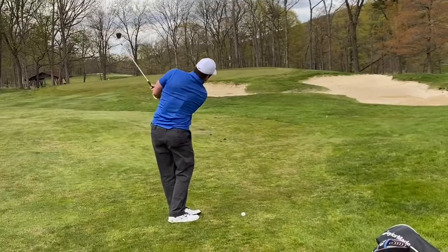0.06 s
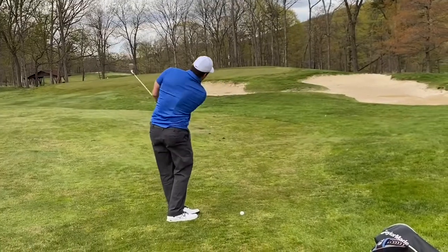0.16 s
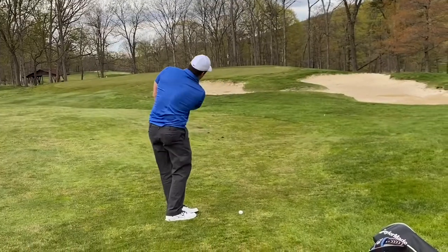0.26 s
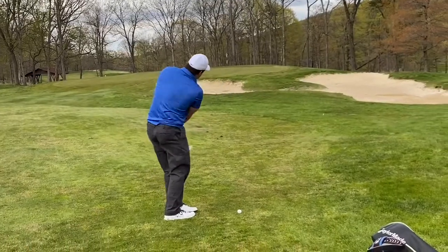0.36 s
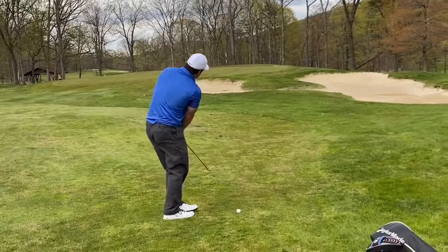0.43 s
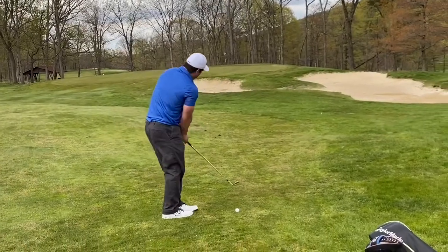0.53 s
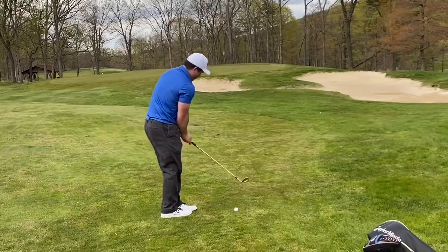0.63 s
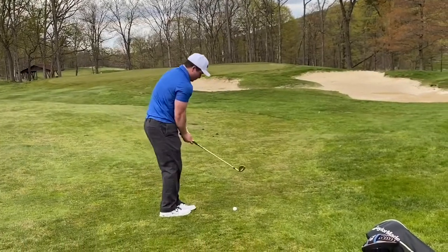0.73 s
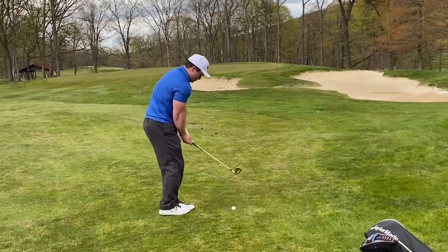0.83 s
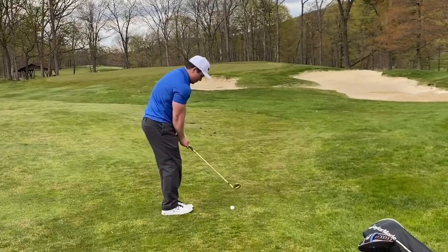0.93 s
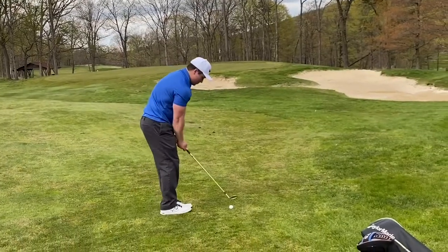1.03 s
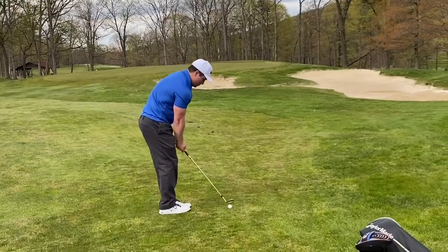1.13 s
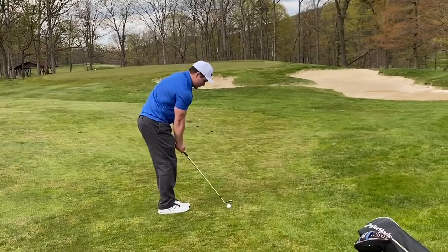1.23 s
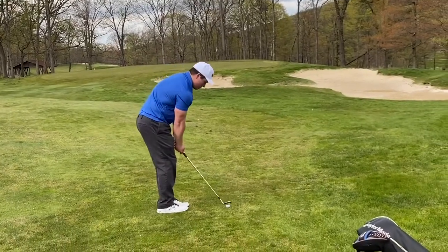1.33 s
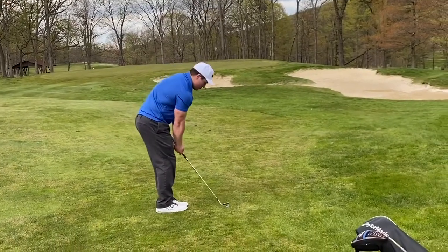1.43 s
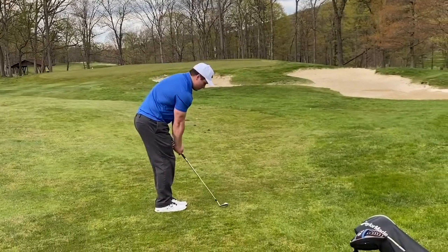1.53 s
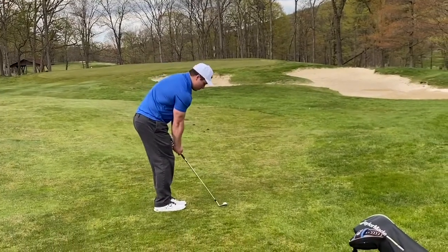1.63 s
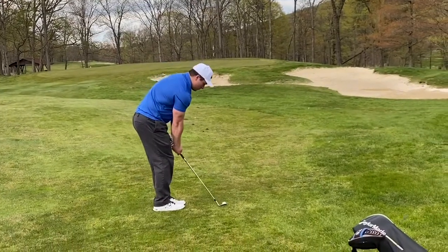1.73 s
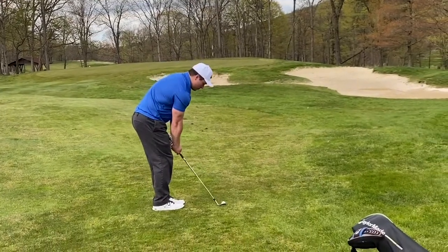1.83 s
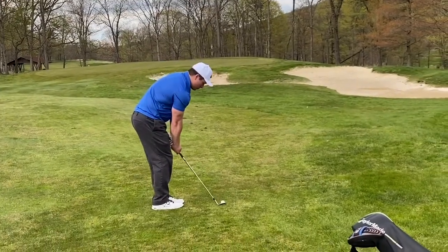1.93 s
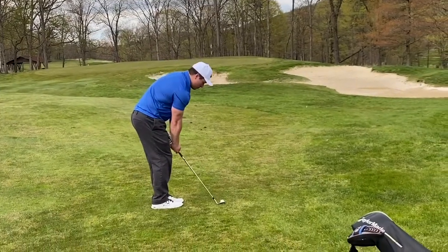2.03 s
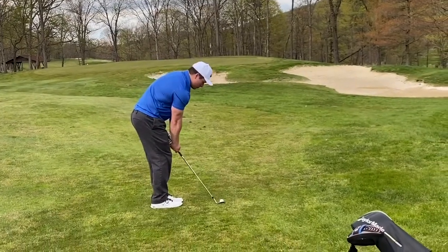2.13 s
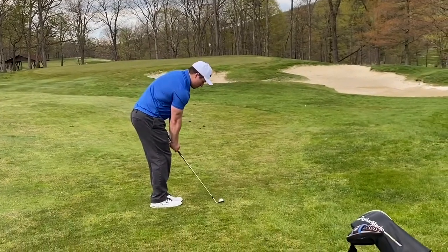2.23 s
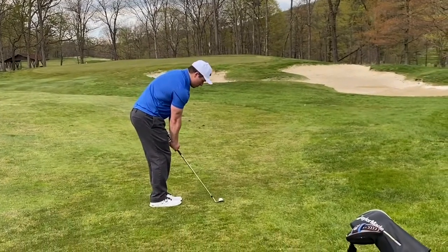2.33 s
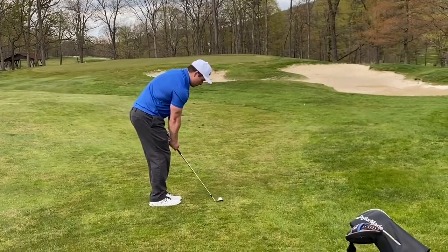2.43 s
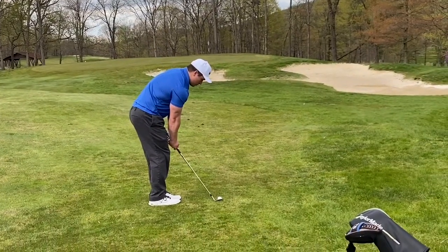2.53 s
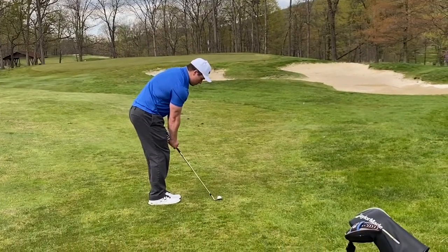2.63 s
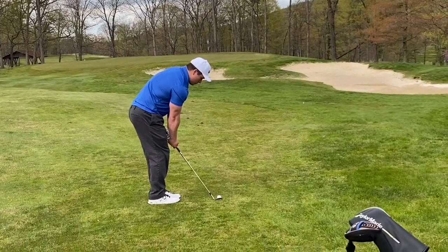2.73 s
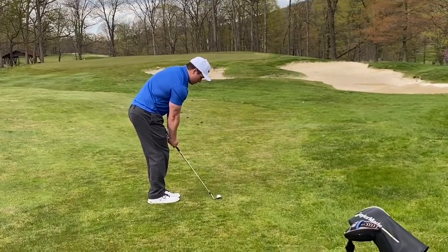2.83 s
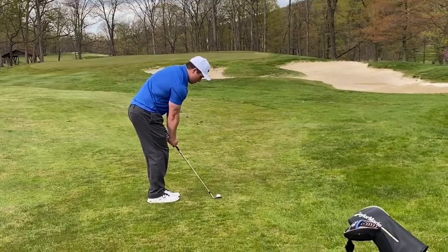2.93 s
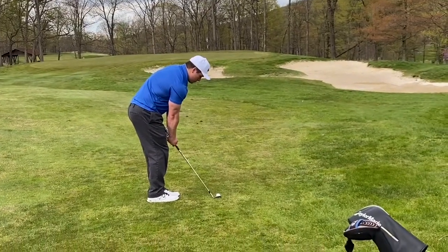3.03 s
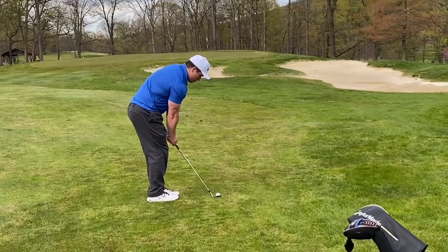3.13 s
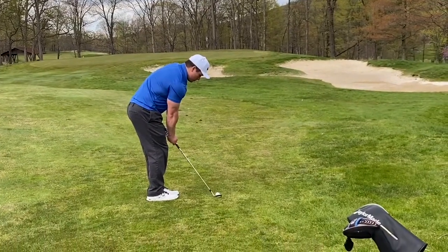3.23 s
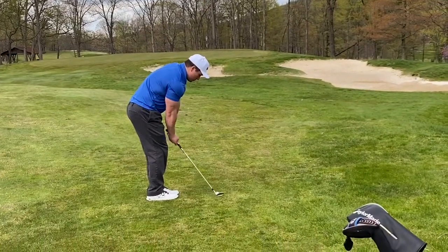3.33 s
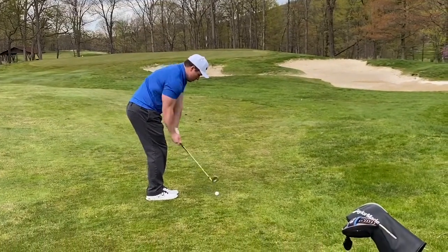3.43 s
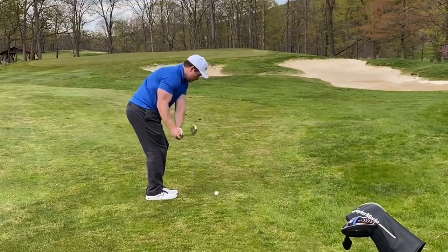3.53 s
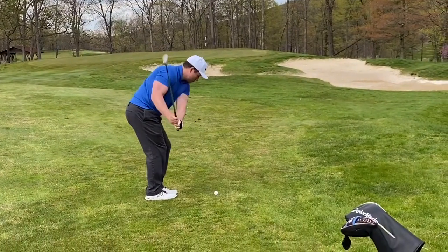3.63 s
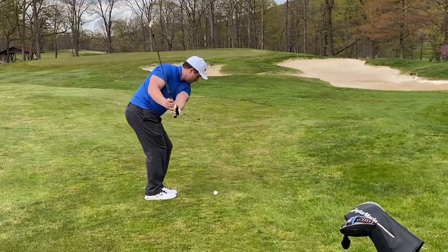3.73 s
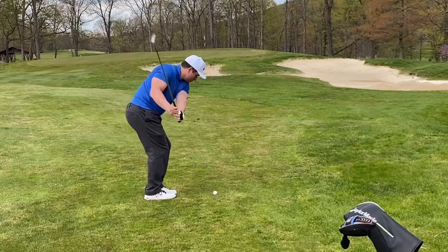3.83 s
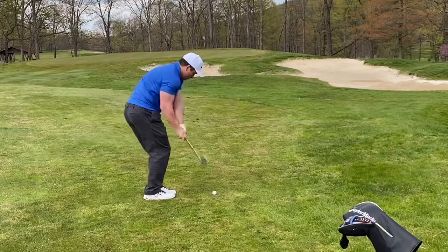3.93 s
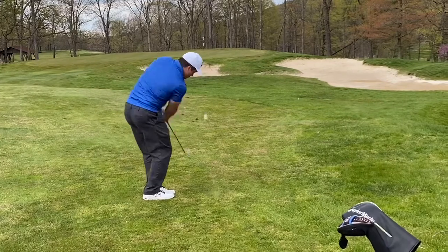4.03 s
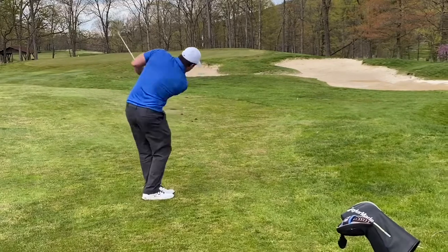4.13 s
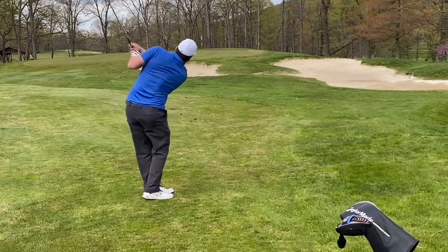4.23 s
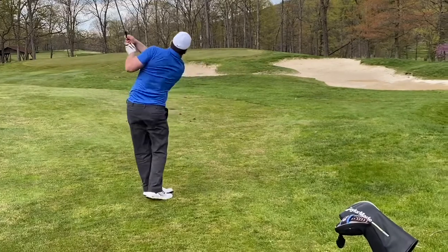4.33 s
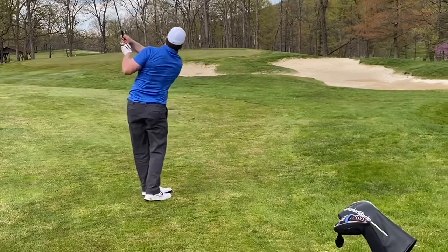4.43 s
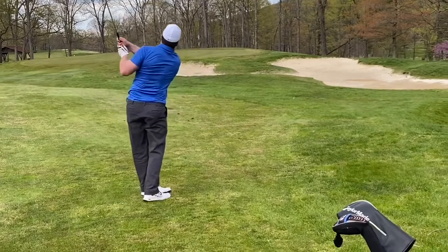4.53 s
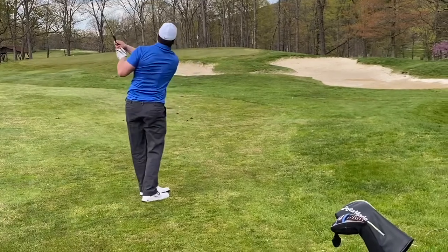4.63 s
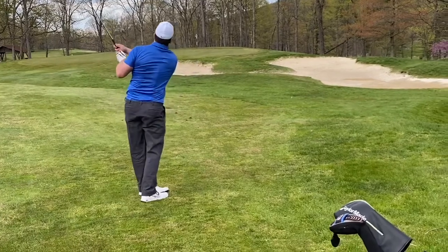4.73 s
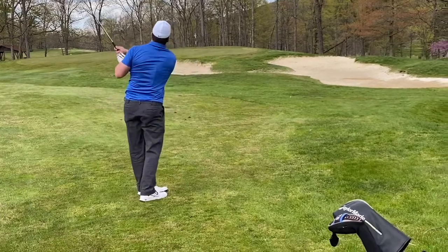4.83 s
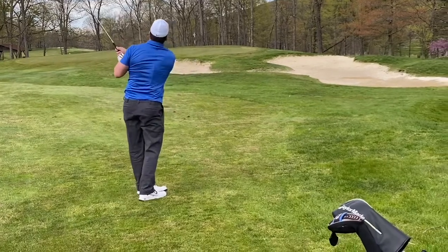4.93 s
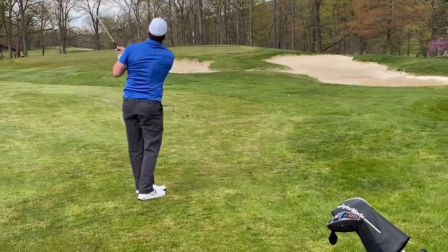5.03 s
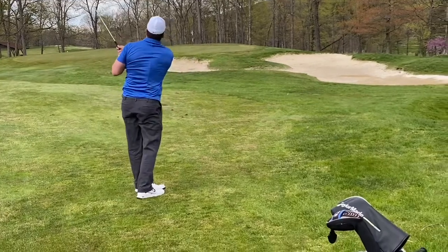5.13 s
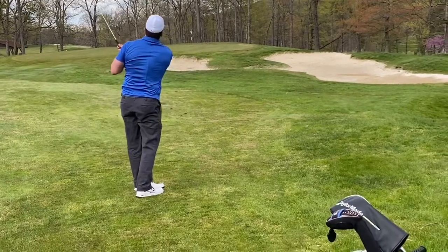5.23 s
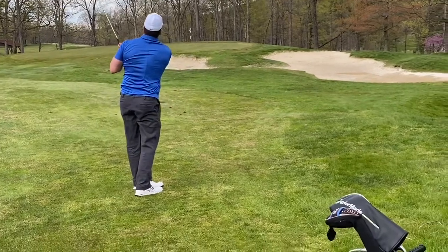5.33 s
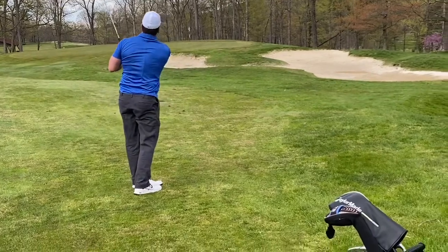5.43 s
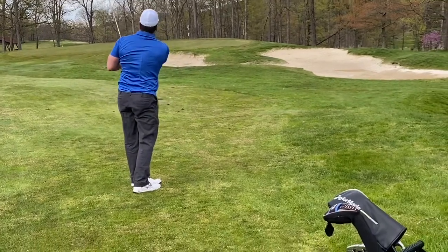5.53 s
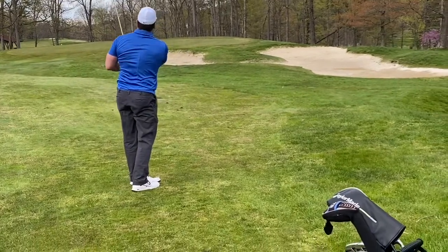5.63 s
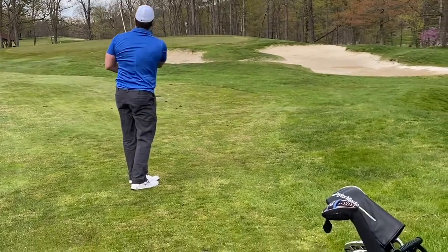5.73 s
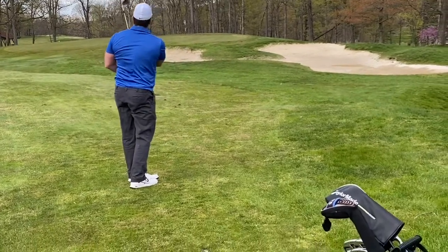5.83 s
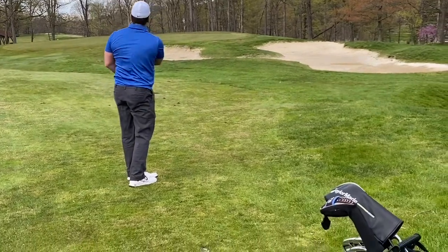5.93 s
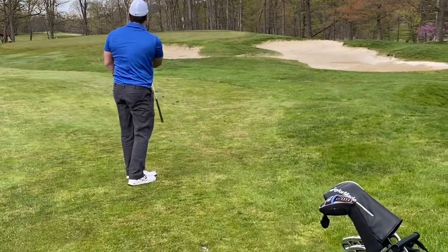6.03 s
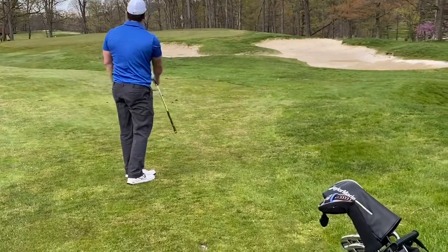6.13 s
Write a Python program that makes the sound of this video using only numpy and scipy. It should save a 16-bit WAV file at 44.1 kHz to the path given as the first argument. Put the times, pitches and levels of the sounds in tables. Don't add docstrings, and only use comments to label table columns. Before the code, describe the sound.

On an open golf course, faint bird whistles, distant traffic hum and light wind surround small ticks from shoes, grip and bag and faint cloth rustles. Nearly four seconds in, a brief swish leads to a crunchy turf scrape and a hard, dry ball click with a low thud. Soil and grass patter down right after, then soft rustles and two dull knocks. Heard from a handheld phone a few metres away, in stereo.

```python
import sys
import numpy as np
from scipy import signal
from scipy.fft import rfft, irfft, next_fast_len
from scipy.io import wavfile

SR = 44100
rng = np.random.default_rng(int(sys.argv[2]) if len(sys.argv) > 2 else 0)


def ratio_of_db(decibels):
    return 10 ** (np.asarray(decibels, float) / 20)


def int16_out(signal):
    q = np.round(np.clip(np.atleast_2d(signal).T, -1, 1) * 32767)
    wavfile.write(sys.argv[1], SR, q.astype(np.int16))


N = 272097
SIZE = next_fast_len(N)
FREQ = np.arange(SIZE // 2 + 1) * SR / SIZE + 1


def curve(points):
    hz, db = np.transpose(points)
    return ratio_of_db(np.interp(np.log(FREQ), np.log(hz), db))


def colour(x, points):
    y = irfft(rfft(x, SIZE) * curve(points), SIZE)[:N]
    return y / np.std(y)


def white():
    return rng.standard_normal(N)


def walk(rate):
    levels = rng.standard_normal(size=2000)
    return 0.98 * np.interp(np.arange(N) * rate / SR, np.arange(len(levels)), levels)


def arch(s, rise_s, hold_s, fall_s, db, edge_db):
    peak_s = s + rise_s
    fall_from_s = peak_s + hold_s
    return [(s, db - edge_db), (peak_s, db), (fall_from_s, db), (fall_from_s + fall_s, db - edge_db)]


def track(rows, fade_s=0.0044):
    s, *columns = np.transpose(rows)
    span = slice(int(s[0] * SR), min(int(s[-1] * SR), N))
    t = np.arange(span.start, span.stop) / SR
    gate = np.clip(np.minimum(t - s[0], s[-1] - t) / fade_s, 0, 1)
    return [span, gate] + [np.interp(t, s, c) for c in columns]


def add(out, s, hz, db, t60, rise_s=0.00043):
    i = int(s * SR)
    t = np.arange(min(int(t60 * SR) + 2, N - i)) / SR - (s - i / SR)
    fade = ratio_of_db(db - 60 * t / t60) * np.clip(t / rise_s, 0, 1)
    out[i:i + len(t)] -= fade * np.sin(2 * np.pi * hz * t)


def grains(per_s, spread_db, hiss):
    hit = rng.random(N) < per_s / SR
    size = rng.exponential(size=N)
    clicks = hit * ratio_of_db(spread_db * np.minimum(size, 3.5)) * np.sign(white())
    return clicks / np.std(clicks) + hiss * white()


def rustle(tables, points, per_s, spread_db, hiss, fade_s=.015):
    level = np.zeros(N)
    for rows in tables:
        span, gate, db = track(rows, fade_s)
        level[span] += gate * ratio_of_db(db)
    return level * colour(grains(per_s, spread_db, hiss), points)


def flecks(tables, low_hz, high_hz, lift_db, count):
    out = np.zeros(N)
    for rows in tables:
        s, db = np.transpose(rows)
        for when, pitch, size in rng.random((count, 3)):
            at = s[0] + when * (s[-1] - s[0])
            hz = low_hz * (high_hz / low_hz) ** pitch
            add(out, at, hz, np.interp(at, s, db) + lift_db - 12 * size, .03, rise_s=0.0034)
    return out


def sing(tables, burr):
    song, drift = np.zeros(N), walk(120)
    warble_hz = 62 + 30 * walk(60)
    warble = np.sin(2 * np.pi * np.cumsum(warble_hz) / SR) + .8 * walk(190)
    for rows in tables:
        span, gate, hz, db = track(rows)
        low_voice = np.clip((2620 - hz) / 200, 0, 1)
        hz = hz * (1 + .005 * drift[span] + burr * low_voice * warble[span])
        song[span] += gate * ratio_of_db(db + 3) * np.sin(2 * np.pi * np.cumsum(hz) / SR)
    return song


def wind_gain():
    # start t/s, rise t/s, hold t/s, fall t/s, peak level/dB
    gust_rows = [(1.52, .07, .02, .12, -51), (2.1, .06, .04, .04, -49), (2.95, .12, .25, .1, -55),
                 (3.6, .2, .3, .3, -53), (4.52, .08, .05, .1, -53), (4.87, .06, .02, .05, -48),
                 (5.1, .22, .22, .2, -42.5), (5.7, .1, .3, .06, -53)]
    gain = np.full(N, ratio_of_db(-61))
    for gust in gust_rows:
        span, gate, db = track(arch(*gust, edge_db=14), fade_s=.02)
        gain[span] += gate * ratio_of_db(db)
    return gain * ratio_of_db(3 * walk(14))


def air():
    # f/Hz, level/dB per Hz
    air_tone = [(22, -34.5), (45, -11.5), (65, -3.5), (130, -4.5), (250, -14.5), (500, -18), (900, -23.5),
                (1300, -35.5), (2500, -40), (4000, -47.5), (7000, -50.5), (12300, -55), (14000, -74),
                (16500, -80.5)]
    # f/Hz, side minus mid level/dB
    air_width = [(60, -21.5), (110, -13), (200, -11.5), (380, -4), (700, -1.5), (1290, 1.5), (2380, -14),
                 (4400, -23), (8120, -6.5), (15000, 1)]
    noise = rfft(rng.standard_normal((2, SIZE))) * curve(air_tone)
    noise[1] *= curve(air_width) * (FREQ < 7000)
    out, slow = 0, walk(.8)
    for octave in range(4, 15):
        share = np.cos(np.pi / 2 * np.clip(np.log2(FREQ) - octave, -1, 1)) ** 2
        flicker = ratio_of_db(.6 * slow + 1.2 * walk(9))
        out = out + flicker * irfft(noise * share, SIZE)[:, :N]
    wind = colour(white(), [(15, -60), (30, -18), (48, 0.5), (75, 0.5), (120, -14), (250, -36),
                            (1000, -80), (20000, -120)])
    mid, side = out * ratio_of_db(-52) / np.std(out[0])
    buffet = wind_gain() * wind
    return mid + buffet, side + ratio_of_db(-20) * np.roll(buffet, int(.03 * SR))


def short_calls():
    # start t/s, length t/s, first f/Hz, last f/Hz, peak level/dB
    note_rows = [(1.3, .07, 2000, 1980, -75), (1.49, .03, 2900, 2950, -70), (3.6, .016, 2130, 2370, -66),
                 (3.608, .026, 2330, 2400, -61), (3.215, .05, 2880, 2900, -76),
                 (1.42, .015, 3300, 3350, -70), (1.475, .015, 2100, 2150, -70),
                 (1.53, .015, 2150, 2180, -71), (2.862, .014, 2850, 2650, -61),
                 (2.876, .014, 2900, 2700, -62), (2.893, .014, 3100, 2700, -59),
                 (3.045, .016, 3600, 3300, -70), (2.246, .012, 2500, 2700, -63),
                 (3.634, .022, 2380, 2440, -66), (3.692, .012, 2260, 2240, -66),
                 (3.622, .012, 2350, 3000, -60), (3.63, .01, 3000, 2300, -62),
                 (3.638, .05, 2170, 2270, -59), (3.686, .012, 3150, 2930, -60),
                 (3.695, .047, 2930, 2720, -52), (3.742, .024, 2720, 2780, -63),
                 (3.748, .047, 2200, 2020, -67), (5.958, .03, 2540, 2500, -74),
                 (5.99, .025, 2600, 2560, -77), (6.02, .03, 2520, 2600, -78), (3.24, .045, 6100, 6830, -73)]
    # start t/s, length t/s, steady f/Hz, peak level/dB
    chip_rows = [(.552, .1, 6880, -76), (1.957, .11, 7260, -68), (3.632, .07, 7200, -77),
                 (4.825, .045, 7100, -75), (4.86, .05, 7150, -74)]
    peak_share, note_edge_db = .6, 6
    drop_s, drop_share, chip_edge_db = .018, .11, 18
    calls = []
    for s, length_s, first_hz, last_hz, db in note_rows:
        peak_hz = first_hz + peak_share * (last_hz - first_hz)
        calls.append([(s, first_hz, db - note_edge_db), (s + peak_share * length_s, peak_hz, db),
                      (s + length_s, last_hz, db - note_edge_db)])
    for s, length_s, hz, db in chip_rows:
        calls.append([(s, hz * (1 + drop_share), db - chip_edge_db), (s + drop_s, hz, db),
                      (s + length_s, hz, db - chip_edge_db)])
    return calls


def birds():
    # t/s, f/Hz, level/dB
    phrases = [
        [(2.215, 2600, -70), (2.24, 2480, -65), (2.26, 2280, -58), (2.29, 2400, -66), (2.312, 3020, -63),
         (2.328, 3230, -64), (2.338, 3450, -71), (2.348, 3050, -67), (2.385, 2920, -58), (2.418, 2850, -59),
         (2.45, 2930, -66), (2.49, 2870, -75), (2.515, 2860, -80)],
        [(2.82, 2520, -70), (2.84, 2640, -63), (2.858, 2500, -61), (2.872, 2290, -58), (2.9, 2330, -60),
         (2.913, 2850, -59), (2.93, 3200, -63), (2.945, 3430, -70), (2.958, 3030, -66), (3.0, 2900, -56),
         (3.04, 2850, -60), (3.06, 2930, -66), (3.095, 2880, -73), (3.11, 2880, -67), (3.126, 2860, -70)],
    ]
    # delay t/s, level/dB
    trunk_rows = [(.021, -13), (.047, -21)]
    # f/Hz, level/dB
    wood_tone = [(1500, 0), (2400, 2), (2800, -14), (3000, -14), (3300, -2), (8000, -10)]
    # f/Hz, level/dB per Hz
    chorus_tone = [(1500, -29.5), (2000, -2.5), (2400, 0.5), (2900, -5.5), (3600, -28.5), (20000, -79.5)]
    song = (sing(phrases, burr=0.04) + sing(short_calls(), burr=.004)) * ratio_of_db(2.5 * walk(90))
    t = np.arange(SR // 2) / SR
    trees = colour(white(), wood_tone)[:len(t)] * ratio_of_db(-60 * t / .3) * (t > .008)
    smear = ratio_of_db(-35.5) * signal.fftconvolve(song, trees)[:N]
    far = ratio_of_db(-86.5 + 4 * walk(13)) * colour(white(), chorus_tone)
    trunks = sum(ratio_of_db(db + 4 * walk(60)) * np.roll(song, int(lag_s * SR)) for lag_s, db in trunk_rows)
    return song + trunks + smear + far


def ticks():
    # t/s, peak level/dB, low ring f/Hz, high ring f/Hz, brightness level/dB
    tick_rows = [(0.1004, -53, 2510, 3840, -31), (0.5641, -56, 2900, 6930, -25),
                 (0.5901, -65, 2550, 4170, -4), (0.715, -64, 3320, 4430, -2), (1.0864, -56, 3460, 5820, -7),
                 (1.164, -50, 3220, 4190, -37), (1.219, -55, 2930, 3950, -16),
                 (1.4003, -53, 2200, 4440, -25), (1.4775, -62, 2150, 4060, -18),
                 (1.6516, -64, 2040, 4550, 1), (1.7878, -45, 2900, 5200, -15),
                 (2.5444, -56.5, 3390, 4980, -17), (2.8614, -48, 2870, 4300, -16),
                 (2.8944, -48, 2900, 5390, -6.5), (3.912, -54, 2290, 4430, -7),
                 (4.5366, -53, 2640, 4110, -9), (5.8774, -62.5, 3220, 4360, -4.5),
                 (4.947, -68, 3600, 3800, -14), (5.535, -72, 4000, 4400, -6), (5.902, -66, 2900, 4100, -14),
                 (5.9334, -66, 2900, 3700, -12), (6.1225, -54.5, 2420, 3830, -14),
                 (6.129, -57, 2500, 3500, -12), (6.136, -59, 3620, 3890, -12),
                 (6.1614, -66.5, 4660, 5900, -1)]
    # t/s, peak level/dB
    snap_rows = [(1.6516, -52), (3.912, -72)]
    # t/s, f/Hz, level/dB, time to fade by 60 dB t/s
    tink_rows = [(1.787, 5700, -59, .045), (1.787, 8100, -71, .045), (1.651, 6300, -60, .01),
                 (1.651, 8300, -60, .012), (1.651, 3600, -62, .01)]
    # t/s, peak level/dB, main ring f/Hz, middle body level/dB, low body level/dB
    knock_rows = [(1.024, -47, 1310, -9, -18), (1.259, -43, 1010, -14, 0), (3.812, -41, 1050, -4, -16),
                  (4.812, -45.5, 1000, -8, -7), (4.817, -31, 1196, -18, -9.5),
                  (6.069, -30.5, 1636, -9.5, -12.5)]
    out = np.zeros(N)
    for s, db, low_hz, high_hz, high_db in tick_rows:
        add(out, s, low_hz, db + 4.5, .008)
        add(out, s, high_hz, db + high_db + 10.5, .009)
        add(out, s, (low_hz + high_hz) / 2, db + high_db + 15, .004)
    tick_snaps = [(tick[0], tick[1] - 34) for tick in tick_rows]
    for s, db in list(snap_rows) + tick_snaps:
        add(out, s, 11200, db + 4, .008)
        add(out, s, 15100, db + 3.0, .006)
    for tink in tink_rows:
        add(out, *tink)
    for s, db, hz, middle_db, low_db in knock_rows:
        add(out, s + .0012, hz, db + 2.5, .005)
        add(out, s + 0.0014, 2200, db - 1, .003)
        add(out, s + .0012, 5200, db - 9, .002)
        add(out, s + 0.0022, 750, db + middle_db + 4, .012)
        add(out, s + .003, 330, db + low_db + 6.5, .025)
    return out


def cloth_and_grass():
    # start t/s, rise t/s, hold t/s, fall t/s, peak level/dB
    dull_rows = [(.5, .07, .02, .1, -63), (1.07, .02, .13, .08, -67), (1.27, .06, .06, .04, -73),
                 (.1, .08, .2, .12, -78), (1.4, .03, .02, .04, -66), (1.45, .04, .02, .1, -69),
                 (1.75, .04, .03, .1, -71), (2.5, .06, .2, .15, -71), (4.66, .04, .04, .08, -79),
                 (4.2, .02, .05, .17, -64), (4.42, .1, .02, .04, -69), (5.18, .06, .17, .05, -76),
                 (5.04, .02, .03, .05, -76), (5.36, .03, .03, .05, -86), (4.79, .02, .03, .06, -72),
                 (6.08, .05, .01, .05, -69)]
    bright_rows = [(2.6, .15, .12, .11, -73), (2.875, .015, .005, .05, -65), (4.44, .04, .01, .04, -78),
                   (1.08, .03, .1, .04, -78), (5.868, .012, .05, .06, -80), (6.11, .02, .03, .02, -78)]
    sheen_rows = [(1.45, .15, .25, .3, -86), (3.0, .05, .05, .05, -92), (4.14, .03, .035, .02, -73),
                  (4.78, .03, .03, .06, -87)]
    # f/Hz, level/dB per Hz
    dull_tone = [(800, -4), (1500, -2), (2200, 4.5), (3000, -1), (4200, -14), (8000, -32), (16000, -40)]
    bright_tone = [(2000, -14), (4000, -2), (4800, -2), (5300, 4), (5900, -3), (7000, -6), (9000, -17),
                   (16000, -35)]
    dull = [arch(*row, edge_db=16) for row in dull_rows]
    bright = [arch(*row, edge_db=16) for row in bright_rows]
    sheen = [arch(*row, edge_db=12) for row in sheen_rows]
    out = rustle(dull, dull_tone, per_s=560, spread_db=3.0, hiss=.7) * ratio_of_db(2.4 * walk(45))
    out += flecks(dull, low_hz=1520, high_hz=3400, lift_db=10, count=14)
    out += rustle(bright, bright_tone, per_s=900, spread_db=2.5, hiss=1.5) * ratio_of_db(2.8 * walk(25.14))
    out += flecks(bright, low_hz=3820, high_hz=7240, lift_db=8, count=25)
    sheen_tone = [(6000, -40), (9500, -4), (12000, 0), (16000, -6)]
    return out + rustle(sheen, sheen_tone, per_s=2000, spread_db=2.0, hiss=1.6)


def swish():
    speed_up = [(3.76, -78, 690), (3.815, -49, 900), (3.848, -49, 2500)]
    span, gate, db, hz = track(speed_up)
    slow = colour(white(), [(10, -1.5), (250, 0), (800, -25), (3000, -71.5)])[span]
    hiss = colour(white(), [(200, -10.5), (800, 2), (3000, -4.5), (8000, -20), (16000, -26)])[span]
    wake = colour(white(), [(10, 0), (450, 0), (1200, -25), (4000, -70)])[span]
    turns = 2 * np.pi * np.cumsum(hz) / SR
    whirls = slow * np.sin(turns) + .45 * wake * np.sin(1.9 * turns)
    out = np.zeros(N)
    out[span] = gate * ratio_of_db(db) * (whirls + .7 * hiss)
    return out


def scrape():
    scrape_row = (3.8475, .004, .006, .011, -19.5)
    # f/Hz, level/dB per Hz
    turf_tone = [(100, -28), (400, -5), (650, -17), (1100, -5), (1700, -2), (2300, -16), (3100, -4.5),
                 (5000, -13.5), (6400, -10), (8000, -13), (11000, -16), (16000, -15)]
    swell = arch(*scrape_row, edge_db=30)
    return rustle([swell], turf_tone, per_s=5000, spread_db=1.5, hiss=1.1, fade_s=.001)


def club_head():
    # f/Hz, level/dB, time to fade by 60 dB t/s, build-up t/s
    dig_modes = [(1700, -12.5, .012, .001), (1220, -18, .012, .001), (3100, -18, .008, .001),
                 (990, -17, .012, .001), (460, -17, .016, .001), (2620, -19, .008, .001)]
    out = np.zeros(N)
    for hz, db, t60, rise_s in dig_modes:
        add(out, 3.8515, hz, db, t60, rise_s)
        add(out, 3.8548, .92 * hz, db - 5, t60, rise_s)
    return out


def ball_click():
    # f/Hz, level/dB, time to fade by 60 dB t/s, build-up t/s
    ball_modes = [(320, -12, .022, .001), (490, -14, .018, .001), (810, -15, .018, .0008),
                  (1000, -8.5, .015, .0007), (1220, -11, .009, .0005), (1500, -12, .009, .0005),
                  (1770, 2, .0052, .0004), (2600, -12.5, .008, .0004), (3060, -16, .023, .0025),
                  (3095, -9.5, .023, .0025), (3130, -16, .023, .0025), (3480, -12.5, .009, .0004),
                  (4860, -10, .011, .0005), (6400, -14, .004, .0003)]
    out = np.zeros(N)
    for mode in ball_modes:
        add(out, 3.85905, *mode)
    return out


def torn_turf():
    # start t/s, rise t/s, hold t/s, fall t/s, peak level/dB
    rumble_row = (3.862, .003, .008, .13, -47)
    settle_row = (3.862, .004, .004, .2, -63)
    spray_row = (3.864, .004, .01, .12, -74)
    # f/Hz, level/dB per Hz
    grass_tone = [(300, -12), (1000, -4), (2500, -5), (5000, -11), (8000, -19), (11000, -27), (16000, -30)]
    rumble_tone = [(150, -12), (400, 0), (1000, -2), (1600, -18), (16000, -70)]
    spray_tone = [(5000, -30), (9000, -3), (12000, 0), (16000, -3)]
    rumble, spray = arch(*rumble_row, edge_db=12), arch(*spray_row, edge_db=12)
    settle = arch(*settle_row, edge_db=3)
    out = rustle([rumble], rumble_tone, per_s=900, spread_db=2.0, hiss=1.5)
    out += rustle([settle], grass_tone, per_s=3000, spread_db=2.2, hiss=1.1, fade_s=.003)
    return out + rustle([spray], spray_tone, per_s=3000, spread_db=1.8, hiss=1.2, fade_s=.003)


def ground_thud():
    # f/Hz, level/dB, time to fade by 60 dB t/s
    thud_mode = (66, -14, 0.075)
    out = np.zeros(N)
    add(out, 3.878, *thud_mode, rise_s=0.032)
    return out


def shaft_ring():
    # t/s, f/Hz, level/dB
    shaft_rows = [(3.88, 6780, -86), (3.95, 6720, -81), (4.03, 6560, -82), (4.15, 6250, -82)]
    return sing([shaft_rows], burr=0) * ratio_of_db(4 * walk(60))


def divot():
    # start t/s, rise t/s, hold t/s, fall t/s, peak level/dB
    fall_row = (4.03, .075, .055, .06, -42)
    # start t/s, rise t/s, hold t/s, fall t/s, peak level/dB
    grit_rows = [(3.907, .007, .01, .015, -62), (3.945, .008, .005, .02, -66), (3.99, .02, .02, .03, -63),
                 (4.04, .015, .03, .04, -57), (4.16, .02, .02, .025, -52), (4.2, .02, .02, .04, -68)]
    # t/s, f/Hz, level/dB, time to fade by 60 dB t/s
    clod_rows = [(4.082, 1510, -35, .02), (4.088, 1150, -40, .015), (4.105, 802, -31, .03),
                 (4.112, 1900, -38, .012), (4.125, 2900, -40, .012), (4.128, 1050, -36, .02),
                 (4.142, 420, -36, .03), (4.15, 1500, -39, .015), (4.165, 800, -39, .02)]
    # f/Hz, level/dB per Hz
    soil_tone = [(150, -10), (350, 1), (1000, -1), (2000, -4), (3500, -7.5), (6000, -16), (8000, -24.5),
                 (11000, -26.5), (16000, -33)]
    fall = [arch(*fall_row, edge_db=19)]
    grit = [arch(*row, edge_db=14) for row in grit_rows]
    grit_tone = [(1000, -14), (2800, 0), (4800, -4), (7500, -17), (10000, -30), (16000, -38)]
    out = flecks(fall, low_hz=600, high_hz=3500, lift_db=8.5, count=60)
    out += rustle(fall, soil_tone, per_s=1800, spread_db=3.0, hiss=.9) * ratio_of_db(1.5 * walk(60))
    out += rustle(grit, grit_tone, per_s=1500, spread_db=2.5, hiss=1.1, fade_s=.005)
    for clod in clod_rows:
        add(out, *clod, rise_s=.004)
    return out


def scene():
    mid, side = air()
    strike = scrape() + club_head() + ball_click() + torn_turf() + ground_thud() + shaft_ring()
    near = birds() + ticks() + cloth_and_grass() + swish() + strike + divot()
    late = np.roll(near, int(.0007 * SR))
    skew_tone = [(50, -1), (2500, 0.5), (4500, -7), (7000, -15.5), (8500, -40.5), (16000, -63.5)]
    skew = colour(late, skew_tone) * np.std(near) * ratio_of_db(-19)
    return np.array([mid + near + side + skew, mid + near - side - skew])


def low_pass(x):
    return signal.sosfilt(signal.butter(12, 16660, fs=SR, output="sos"), x)


def record(dry):
    # f/Hz, lead of the left port/radians
    port_lead = [(0, 0), (7400, 0), (8800, -2.85), (9400, -3.4), (10700, -6), (11700, -6.5), (12900, -9.2),
                 (13700, -9.6), (14700, -12.4), (22050, -13)]
    turn = np.exp(.5j * np.interp(FREQ, *np.transpose(port_lead)))
    top = np.clip((15900 - FREQ) / 300, 0, 1) ** 2
    mix = irfft(rfft(dry, SIZE) * np.array([turn, turn.conj()]) * top, SIZE)[:, :N]
    return low_pass(mix)


dry = scene()
out = record(dry)
int16_out(out)
```